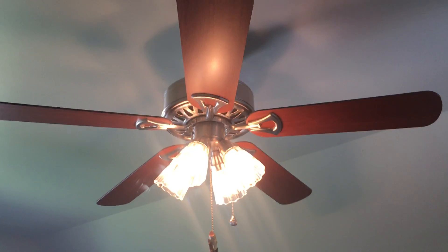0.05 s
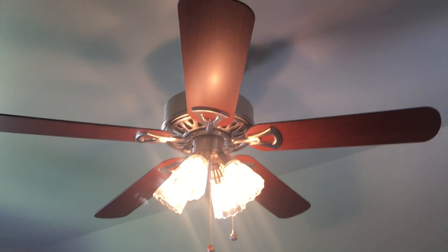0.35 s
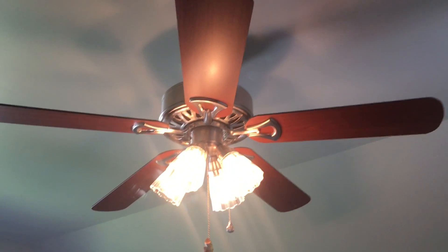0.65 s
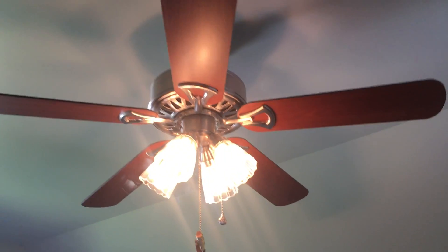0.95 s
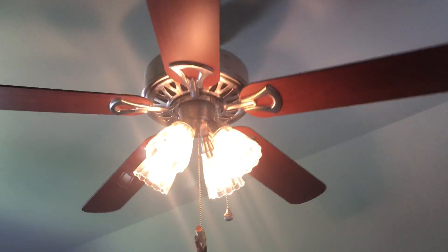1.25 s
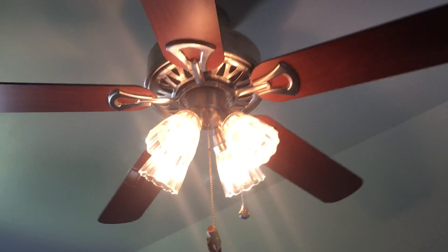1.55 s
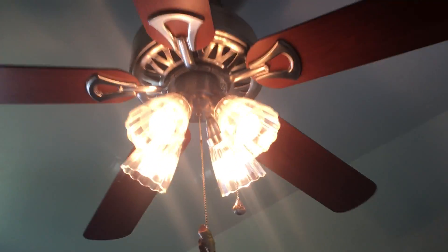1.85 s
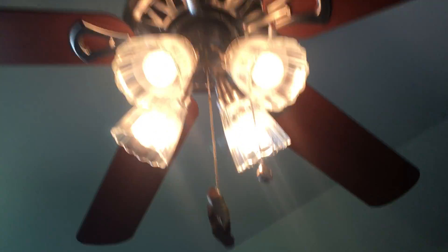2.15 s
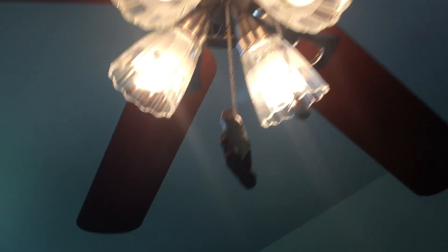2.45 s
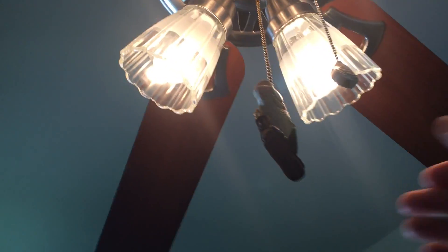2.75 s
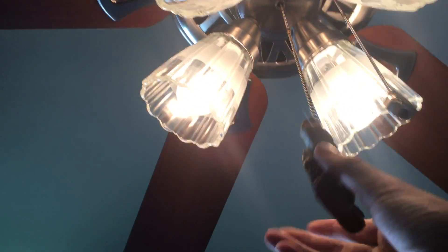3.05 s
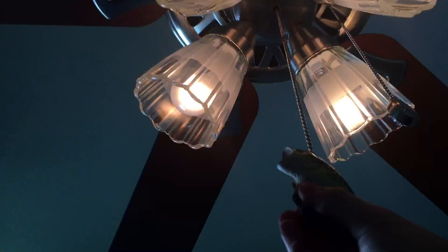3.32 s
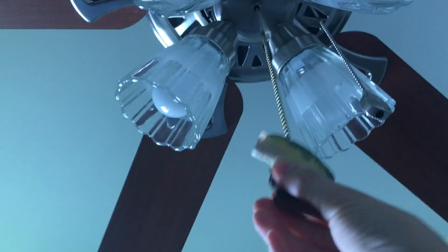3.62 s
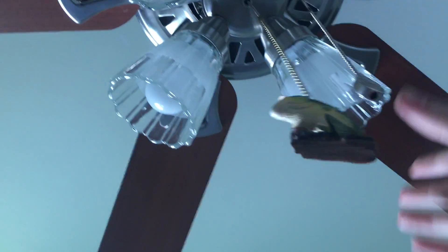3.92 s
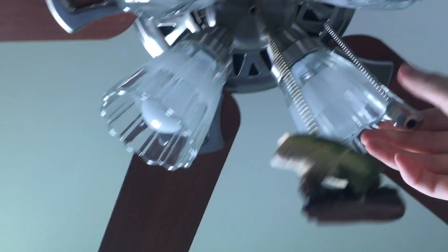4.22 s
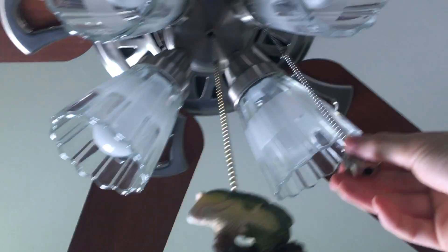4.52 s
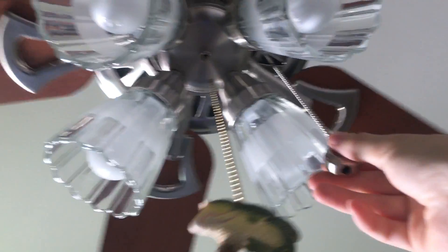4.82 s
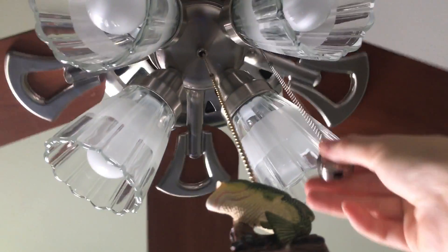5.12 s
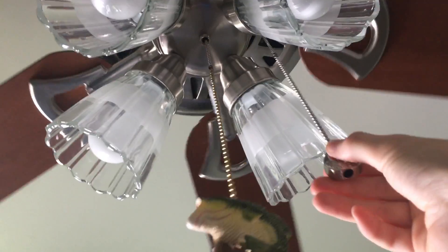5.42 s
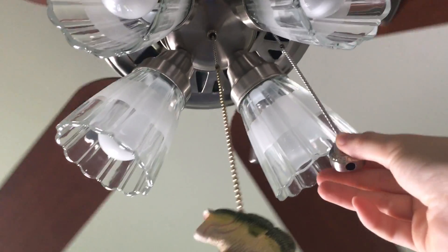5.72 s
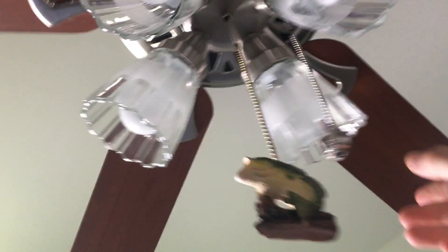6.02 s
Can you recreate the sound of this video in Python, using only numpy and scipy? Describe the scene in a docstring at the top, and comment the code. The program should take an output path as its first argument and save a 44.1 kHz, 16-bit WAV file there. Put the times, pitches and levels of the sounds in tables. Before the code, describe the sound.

A small, quiet room with faint hiss and a low rumble, heard from a hand-held phone. From about 1.3 to 1.6 seconds fingers knock on the case, dry and hollow, right at the microphone. More bumps and brief rubbing follow between 2.1 and 2.5 seconds. Around 3.3 seconds a metal bead chain ticks lightly, close by. A ceiling fan's light switch snaps sharply at 3.5 seconds and springs back at 3.7, with a slight ring from the housing and a few trailing ticks. The fan's own chain is then pulled three times, at about 4.6, 5.0 and 5.5 seconds. Each pull gives a click, a short rattle, a metallic ring and a soft low throb, with a release click a fifth of a second later. The faint rumble grows as the fan starts turning, with one last bead tick just before the end at 6 seconds.

```python
"""A small, quiet room, on a hand-held phone. Fingers rub and knock on the case, right at the microphone,
as it is carried up under a ceiling fan. Close by, the light's bead chain is pulled once: two beads tick
over the rim before each stroke, the switch snaps in and springs back, the chain rattles and the metal
housing rings. The fan's chain follows, three times; each pull sets the hanging body throbbing, and a low
rumble grows as the fan starts to turn."""
import sys
import numpy as np
from scipy import signal
from scipy.fft import rfft, irfft, next_fast_len
from scipy.io import wavfile
from scipy.ndimage import uniform_filter1d

SR = 44100
rng = np.random.default_rng(int(sys.argv[2]) if len(sys.argv) > 2 else 0)


def transcribe(u):
    """Save the signal u as a 16-bit wav file named by the first command-line argument.

    u: samples, shape (n,) or (channels, n), limited to [-1, 1]; the rate is SR.
    q: integer samples, one column per channel.
    """
    v = np.clip(np.atleast_2d(u).T, -1, 1)
    q = np.round(v * 32767).astype(np.int16)
    wavfile.write(sys.argv[1], SR, q)


N = 267775

# switch snaps, pull and release in turn: start_s, level_db, treble_db, bite_db, ring_db, run_up_s
LIGHT_SNAPS = [(3.4812, -18.5, 11, 1.5, -39.5, .0712), (3.7372, -19.5, 3, -3, -39, .0938)]
FAN_SNAPS = [(4.5556, -28, 0.5, -0.5, -29.5, .0667), (4.7795, -23.5, 0, 17.5, -32.5, 0.041),
             (5.0385, -26.5, -1, 8.5, -34.5, 0.054), (5.2474, -22, -0.5, 7.5, -39, 0.046),
             (5.4910, -25.5, 1.5, 8, -32.5, .0767), (5.7066, -22, 6.5, 4, -30.5, 0.05)]
# colour of one bead's tick on each chain: frequency_hz, density_db
LIGHT_BEAD_COLOUR = [(300, -29), (660, 2.5), (950, -14), (1700, 8), (2400, 3.5), (3200, -20), (6100, -13),
                     (8000, -22), (14500, -10)]
FAN_BEAD_COLOUR = [(180, -42), (300, -11.5), (667, -6), (978, -4.5), (1140, -1), (1280, -8.5), (1430, 2.5),
                   (2790, -9), (3830, -9), (4910, -19), (5430, -11), (7820, -33), (16000, -28)]


def amp(db):
    """Decibels to gain."""
    return 10 ** (np.asarray(db) / 20)


def unit(x):
    """Scaled to rms 1."""
    return x / np.sqrt(np.mean(x ** 2) + 1e-20)


def along(points, hz):
    """Points of frequency_hz, value, read on a log frequency axis."""
    point_hz, values = np.transpose(points)
    return np.interp(np.log(hz + 1), np.log(point_hz + 1), values)


def level(rows):
    """A curve of time_s, level_db as one gain per sample."""
    s, db = np.transpose(rows)
    return amp(np.interp(np.arange(N) / SR, s, db))


def swell(t, crest, rise, fall):
    """An exponential rise to 1 at the crest and an exponential fall."""
    return np.exp(np.minimum((t - crest) / rise, (crest - t) / fall))


def add(track, s, sound):
    """Mix a sound into a track at a time."""
    part = track[round(s * SR):][:len(sound)]
    part += sound[:len(part)]


def noise(colour):
    """Steady noise of rms 1 with the given spectrum: frequency_hz, density_db."""
    size = next_fast_len(N + SR // 4)
    gain = amp(along(colour, np.fft.rfftfreq(size, 1 / SR)))
    return unit(irfft(rfft(rng.standard_normal(size)) * gain, size)[:N])


def background(hiss_db=-77, tick_db=-68, tick_hz=20):
    """Room air and microphone hiss with a faint, even electrical ticking."""
    air_levels = [(0, -75), (3.2, -69.5), (6.07, -72)]  # room air, louder near the ceiling: time_s, level_db
    air_colour = [(60, -30), (150, 0), (300, 1.5), (500, -5.5), (1000, -9), (2200, -12), (3200, -19),
                  (8000, -24)]  # room air: frequency_hz, density_db
    hiss_colour = [(1000, -6.5), (3000, 1.5), (4800, -3.5), (6200, 2), (8000, -4), (10600, -3.5),
                   (11050, 8), (11700, -4.5), (14300, -2.5), (14850, -1), (15500, -0.5)]  # microphone hiss: frequency_hz, density_db
    tick_colour = [(3000, -25), (5200, -5), (6300, 0), (7500, -4), (10000, -12), (15000, -15)]
    since_tick = (np.arange(N) / SR - .016) % (1 / tick_hz)
    ticks = np.exp(-since_tick / .001) * noise(tick_colour)
    air = level(air_levels) * noise(air_colour)
    return air + amp(hiss_db) * noise(hiss_colour) + amp(tick_db) * ticks


def rumble(near_from_s=2.83, near_takes_s=0.85):
    """The room's rumble gives way to the fan's own as the microphone comes under it."""
    rumble_levels = [(0, -67), (1, -69), (1.5, -61.5), (2.4, -65.5), (3.2, -60.5), (3.85, -54.5),
                     (4.3, -57), (4.8, -56.5), (5.6, -52), (5.97, -49), (6.07, -52)]  # rumble at the microphone: time_s, level_db
    room_colour = [(12, -24), (20, -18), (48, 5), (86, -5), (102, -7.5), (134, -10.5), (211, -22.5),
                   (250, -17), (320, -26.5), (550, -120)]  # the still room: frequency_hz, density_db
    fan_colour = [(12, -8.5), (20, -16.5), (59, -7), (74, -1), (88, -4), (107, -17), (171, -23),
                  (250, -26.5), (320, -57), (550, -120)]  # under the fan: frequency_hz, density_db
    near = np.clip((np.arange(N) / SR - near_from_s) / near_takes_s, 0, 1)
    blend = np.sqrt(1 - near) * noise(room_colour) + np.sqrt(near) * noise(fan_colour)
    return level(rumble_levels) * blend


def rubbing(grain_db=4):
    """Skin slides in short strokes, catching and slipping every few milliseconds."""
    # skin on the case, then on the chain's pendant: crest_s, level_db, rise_s, fall_s
    rubs = [(1.42, -70.5, 0.2, 0.081), (1.65, -71, .02, 0.052), (2.065, -54, 0.027, 0.051),
            (2.36, -48, 0.018, .03), (3.46, -63.5, 0.063, 0.078), (3.77, -61, 0.039, 0.029)]
    rub_colour = [(150, -15), (550, 2.5), (900, 4), (1800, 3), (2500, 0.5), (3500, -36), (8000, -37),
                  (16000, -35)]  # sliding skin: frequency_hz, density_db
    t = np.arange(N) / SR
    grip = amp(grain_db * unit(uniform_filter1d(rng.standard_normal(N), size=180)))
    strokes = sum(amp(db) * swell(t, s, rise, fall) for s, db, rise, fall in rubs)
    return strokes * unit(grip * noise(rub_colour))


def thud(hz, t60, attack, sag):
    """A few damped cycles whose pitch sags as the finger settles."""
    t = np.arange(SR // 8) / SR
    envelope = (1 - np.exp(-t / attack)) * amp(-60 * t / t60)
    pitch = hz * (1 + sag * (2 * np.exp(-t / 0.003) - 1))
    return envelope / envelope.max() * np.sin(2 * np.pi * np.cumsum(pitch) / SR)


def burst(colour, t60, treble_db=0, bite_db=0, size=4096):
    """Two surfaces meet: coloured chatter that dies quickly, with a treble shelf and a bite at 5.4 kHz."""
    hz = np.fft.rfftfreq(size, 1 / SR)
    treble = hz ** 4 / (hz ** 4 + 4500. ** 4)
    bite = 1 / (1 + ((hz - 5400) / 700) ** 2)
    gain = amp(along(colour, hz) + treble_db * treble + bite_db * bite)
    # minimum phase, so nothing sounds ahead of the contact
    cepstrum = irfft(np.log(np.maximum(unit(gain), 1e-6)))
    cepstrum[1:size // 2] *= 2
    cepstrum[size // 2 + 1:] = 0
    chatter = rng.choice([-1, 1], size) * amp(-60 * np.arange(size) / SR / t60)
    return irfft(rfft(chatter) * np.exp(rfft(cepstrum)))


def in_room(sound, wet_db):
    """The direct sound and a fresh tail from the close walls, which soak up the top treble."""
    t60 = [(300, 0.32), (2000, 0.25), (5500, 0.28), (9000, 0.22), (15000, 0.22)]  # frequency_hz, t60_s
    colour = [(300, 4), (2000, 5.0), (6000, 0.5), (9000, 3.5), (11000, -1.5), (15000, -10.0)]
    hz, t, spectra = signal.stft(rng.standard_normal(SR // 2), SR, nperseg=256)
    decay = amp(-60 * t / along(t60, hz)[:, None])
    tail = signal.istft(spectra * decay * amp(along(colour, hz))[:, None], SR, nperseg=256)[1]
    tail *= 1 - np.exp(-(np.arange(len(tail)) / SR / 0.0026) ** 2)
    response = amp(wet_db) * tail / np.linalg.norm(tail)
    response[0] = 1
    return signal.fftconvolve(sound, response)


def knocks(thud_t60_s=0.018, rough_db=-8, hollow_db=-12, scuff_db=-21.5, slide_db=-13, low_cut_hz=60):
    """Fingers land on the case: a scuff, a dry hollow tick, a rough thud, a push of the whole phone."""
    # touches at the microphone: start_s, tick_db, treble_db, thud_db, thud_hz, push_db
    touches = [(1.3276, -32, 4.5, -33.5, 316, -48), (1.464, -49, 9, -49, 920, -80),
               (1.4900, -22, -1.5, -17, 346, -27.5), (1.6026, -22, 9.5, -25, 480, -31),
               (2.0580, -40, -11, -47, 720, -47), (2.096, -40.5, -23, -41, 436, -51),
               (2.1160, -72, 0, -44, 335, -57), (2.26, -43, 4, -30.5, 616, -44.5),
               (2.3259, -45, 8, -50, 1020, -65), (2.352, -45, -17, -36, 600, -66),
               (2.3650, -24, -5.5, -23.5, 844, -58), (2.3752, -42, -8, -19, 550, -53),
               (2.3873, -34, -5, -32, 653, -59), (2.3950, -25, 4.5, -35, 800, -73),
               (2.41, -37.5, 5, -48, 910, -71), (2.4139, -19.5, 0, -24, 484, -39.5),
               (2.4236, -31.5, -1, -23, 344, -44), (2.4665, -27.5, 7, -34, 754, -71),
               (4.9867, -45.5, 12, -43.5, 516, -51)]
    tick_colour = [(200, 4.5), (700, -0.5), (2000, 6.5), (3800, -7), (6000, -12), (11000, -19),
                   (16000, -29)]  # the case's tick: frequency_hz, density_db
    case_modes = [(1684, 1, 0.019), (2690, -5.5, 0.017), (3170, -8.5, 0.013), (3700, -2.5, 0.01)]  # the hollow case: pitch_hz, level_db, t60_s
    out, scuffs, t = np.zeros(N), np.zeros(N), np.arange(N) / SR
    age = t[:SR // 8]
    hollow = sum(amp(db - 60 * age / t60) * np.sin(2 * np.pi * hz * age) for hz, db, t60 in case_modes)
    for s, tick_db, treble_db, thud_db, hz, push_db in touches:
        sound = amp(thud_db) * thud(hz, thud_t60_s, attack=0.00055, sag=0.19)
        dull = [(hz / 6, -18), (hz / 2, -6), (hz, 0), (hz * 2, -5), (hz * 5, -32), (hz * 12, -60)]
        add(sound, 0, amp(thud_db + rough_db) * burst(dull, thud_t60_s))
        add(sound, 0, amp(tick_db) * burst(tick_colour, t60=0.0064, treble_db=treble_db))
        add(sound, 0, amp(tick_db + hollow_db) * hollow)
        add(sound, .003, amp(push_db) * thud(hz=147, t60=0.042, attack=0.00086, sag=0.39))
        add(out, s, in_room(sound, wet_db=-38))
        scuffs += amp(tick_db + scuff_db) * swell(t, s, rise=0.0057, fall=0.0057)
        scuffs += amp(push_db + slide_db) * swell(t, s, rise=0.00067, fall=0.016)
    skin = noise([(100, 6.5), (500, 9.5), (1000, 0.0), (3700, -10),
                  (4900, -24.5), (10000, -25), (16000, -31)])
    low_cut = signal.butter(2, low_cut_hz, "high", fs=SR, output="sos")
    return signal.sosfilt(low_cut, out + scuffs * skin)


def strike(contact, ring_db, wet_db, tilt_db_per_octave=0):
    """A metal contact rings the housing's modes, each time at new strengths, out into the room."""
    housing_modes = [(490, -9.5, 0.31), (672, -1.5, 0.27), (1140, 0.5, 0.25), (1473, -3.5, 0.3),
                     (1749, -2.5, 0.47), (2080, -8, 0.31), (2285, 5, 0.26), (3106, -6.5, 0.35),
                     (3343, 7, 0.098), (4260, -15, 0.12), (4640, -6, .2), (5459, -6, .19), (5530, -4, 0.11)]  # switch housing and lamp fitting: pitch_hz, level_db, t60_s
    t = np.arange(SR // 2) / SR
    hz, mode_db, t60 = np.transpose(housing_modes)[:, :, None]
    tilt_db = tilt_db_per_octave * np.log2(hz / 2000)
    strength = amp(mode_db + ring_db + tilt_db + 2 * rng.standard_normal(hz.shape))
    tones = np.sin(2 * np.pi * (hz * t + rng.random(hz.shape)))
    sound = np.sum(strength * amp(-60 * t / t60) * tones, axis=0)
    sound *= 1 - np.exp(-t / 0.00029)
    add(sound, 0, contact)
    return in_room(sound, wet_db)


def bead(s, treble_db, change_chains_s=4.2):
    """One bead hits the rim: on the light's chain, or, once the hand has moved over, on the fan's."""
    if s < change_chains_s:
        contact = burst(LIGHT_BEAD_COLOUR, t60=0.025, treble_db=treble_db)
        return strike(contact, ring_db=-31, wet_db=-9.5, tilt_db_per_octave=-6)
    contact = burst(FAN_BEAD_COLOUR, t60=0.041, treble_db=treble_db)
    return strike(contact, ring_db=-31.5, wet_db=-7.5)


def beads():
    """Beads tick when a chain is jostled, and two slip over the rim ahead of every snap."""
    jostles = [(3.2508, -61, -7), (3.3432, -53, 5), (3.3737, -51.5, -33), (3.3974, -43.5, -31),
               (3.6702, -50.5, -25), (3.729, -46, -19), (3.805, -40, 1), (3.8633, -42.5, 8),
               (4.9446, -51.5, -4), (5.8671, -45, 5)]  # the hand takes a chain or lets it go: start_s, level_db, treble_db
    # beads before a pull, then a release: level_db, treble_db, share_left (of the run-up, at bead two)
    light_run_ups = [(-43, 6, .45), (-48.5, 5, 0.87)]
    fan_run_ups = [(-47, -4, .44), (-46.5, 12.5, .29)]
    ticks = list(jostles)
    for snaps, run_ups in ((LIGHT_SNAPS, light_run_ups), (FAN_SNAPS, fan_run_ups)):
        for k, (s, *_, run_up_s) in enumerate(snaps):
            db, treble_db, share_left = run_ups[k % 2]
            ticks += [(s - run_up_s, db, treble_db), (s - share_left * run_up_s, db, treble_db)]
    out = np.zeros(N)
    for s, db, treble_db in ticks:
        add(out, s, amp(db) * bead(s, treble_db))
    return out


def chain_slide(snaps, colour, level_db):
    """A chain scrapes faintly through its outlet, louder and louder until the switch snaps."""
    t = np.arange(N) / SR
    runs = sum(swell(t, s, rise=0.025, fall=.004) for s, *_ in snaps)
    return amp(level_db) * runs * noise(colour)


def switch(snaps, colours, chatter_t60, wet_db, rattle_db, tilt_db_per_octave):
    """The ratchet snaps in on the pull and springs back on the release; the shaken chain rattles on."""
    rattle_s, rattle_ticks, fade_db_per_s = .07, 6, 214
    out = np.zeros(N)
    for k, (s, db, treble_db, bite_db, ring_db, _) in enumerate(snaps):
        colour = colours[k % 2]
        contact = np.pad(burst(colour, chatter_t60, treble_db, bite_db), (0, SR // 8))
        for late in rattle_s * (np.arange(rattle_ticks) + rng.random(rattle_ticks)) / rattle_ticks:
            tick = burst(colour, 0.013, treble_db, bite_db)
            add(contact, late, amp(rattle_db - fade_db_per_s * late) * tick)
        add(out, s, amp(db) * strike(contact, ring_db, wet_db, tilt_db_per_octave))
    return out


def light_switch():
    """One pull works the light's ratchet, close to the microphone, with little rattle."""
    # colours of the snap in and the spring back: frequency_hz, density_db
    pull = [(180, -69), (300, -28), (645, -13.5), (1320, -7), (1720, 6.5), (2480, -7), (2840, -10),
            (4590, -18), (4990, -33), (5700, -13), (6300, -16.5), (9390, -6.5), (10400, -14), (15000, -2),
            (16000, -10)]
    release = [(180, -53), (300, -35), (486, -26), (787, -16.5), (1690, -4), (2000, -8.5), (2250, 1),
               (2930, -18), (3240, -13), (4830, -19), (6100, -12), (8090, -21), (12300, -10), (14700, -17),
               (16000, -20)]
    return switch(LIGHT_SNAPS, (pull, release), chatter_t60=0.02, wet_db=-9.5, rattle_db=-24,
                  tilt_db_per_octave=-2.5)


def hanging_hiss(ramp_s=0.0057):
    """A soft hiss hangs on after the light switch, stops abruptly, and returns after the last pull."""
    spells = [(3.478, 4.145, -65.5), (5.593, 6.2, -64.5)]  # spells of soft hiss: start_s, end_s, level_db
    colour = [(300, 3.5), (2500, -2), (6000, -5.5), (10000, -8), (16000, -8.5)]
    t = np.arange(N) / SR
    envelope = sum(amp(db) * np.clip(np.minimum(t - start, end - t) / ramp_s, 0, 1)
                   for start, end, db in spells)
    return envelope * noise(colour)


def fan_switch():
    """Three pulls work the fan's ratchet, with more rattle and a brighter ring."""
    # colours of the snap in and the spring back: frequency_hz, density_db
    pull = [(180, -23), (300, -17), (689, -7), (885, -14), (1030, -9.5), (1390, -3.5), (1560, -4.5),
            (1690, 5), (1970, -6.5), (3240, -7.5), (4990, -20.5), (5520, -16), (7820, -14), (15000, -2.5),
            (16000, -17)]
    release = [(180, -58), (300, -36), (978, -21), (1120, -11), (1690, -6), (1840, -3.5), (2030, 0),
               (2880, -6), (3350, -1.5), (3890, -11), (4300, -6.5), (5340, -14), (8640, -17), (12300, -11),
               (16000, -8.5)]
    return switch(FAN_SNAPS, (pull, release), chatter_t60=0.027, wet_db=-7.5, rattle_db=-18,
                  tilt_db_per_octave=2.0)


def fan_throb(pitch_hz=67, lag_s=0.0522, half_width_s=.028, first_db=-34, step_db=1.5, shudder_db=-17):
    """Each pull of the fan's chain, harder than the last, sets the hanging body throbbing."""
    out, t = np.zeros(N), np.arange(N) / SR
    shudder_colour = [(20, -18), (40, -7), (100, -1), (170, -13), (260, -20), (500, -76)]
    shudder = amp(shudder_db) * noise(shudder_colour)
    for k, (s, *_) in enumerate(FAN_SNAPS[::2]):
        age = t - s - lag_s
        sway = np.sin(2 * np.pi * (pitch_hz * age + rng.random()))
        out += amp(first_db + k * step_db) * np.exp(-(age / half_width_s) ** 2) * (sway + shudder)
    return out


def scene():
    """Both switches and their chains, the hand, the fan and the room, at one microphone."""
    chains = light_switch() + fan_switch() + beads()
    chains += chain_slide(LIGHT_SNAPS, LIGHT_BEAD_COLOUR, level_db=-57)
    chains += chain_slide(FAN_SNAPS, FAN_BEAD_COLOUR, level_db=-56)
    handling = knocks() + rubbing()
    return (chains + handling + rumble() + fan_throb() + background() + hanging_hiss())[None]


def record(dry, top_hz=15900):
    """The phone keeps nothing above its band limit."""
    size = next_fast_len(N + SR // 4)
    hz = np.fft.rfftfreq(size, 1 / SR)
    return irfft(rfft(dry, size) / (1 + (hz / top_hz) ** 160), size)[:, :N]


dry = scene()
out = record(dry)
transcribe(out)
```